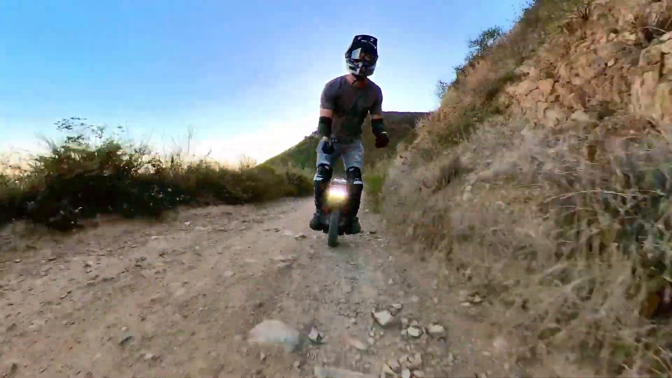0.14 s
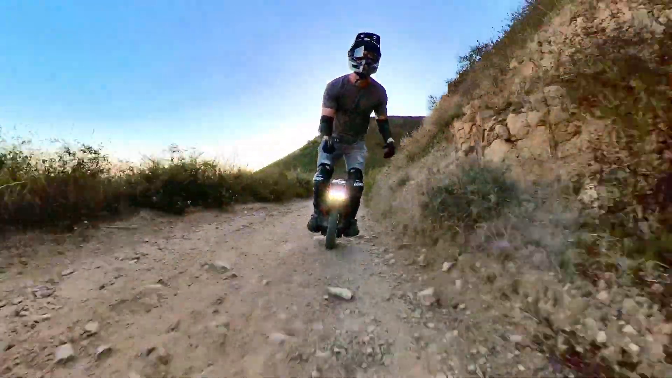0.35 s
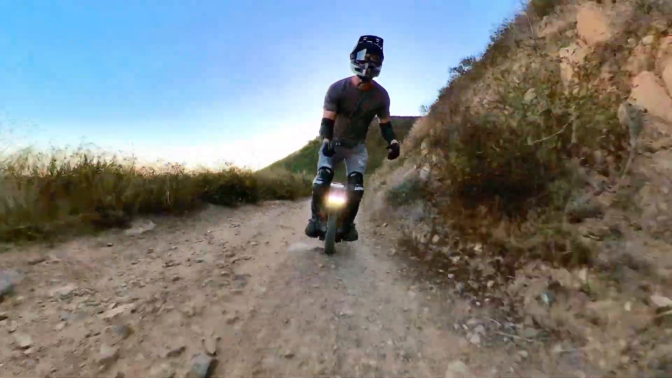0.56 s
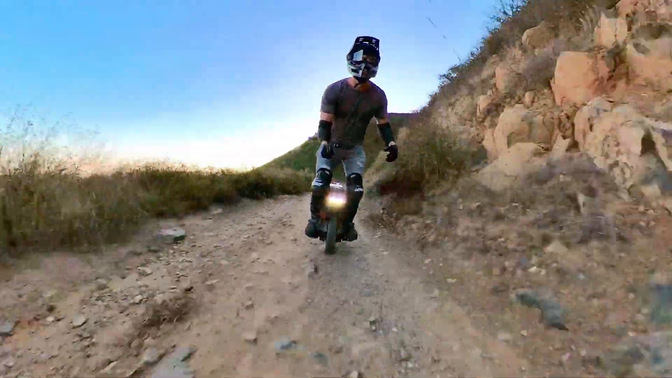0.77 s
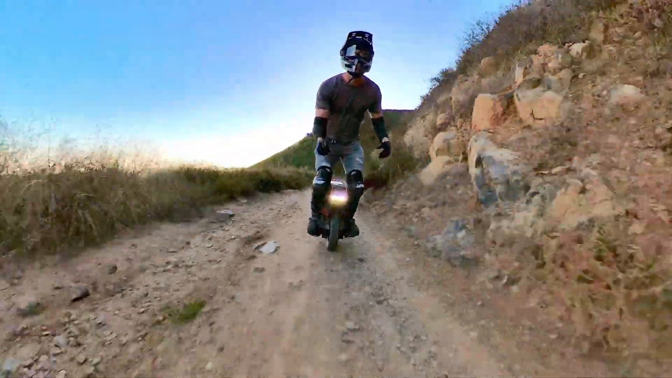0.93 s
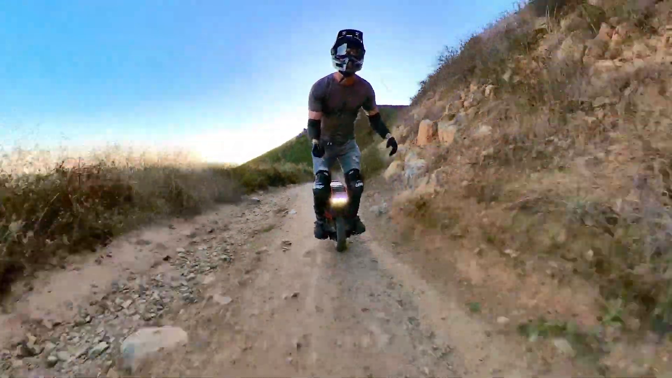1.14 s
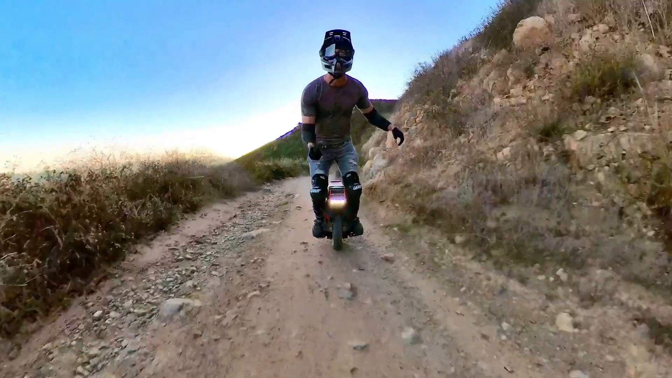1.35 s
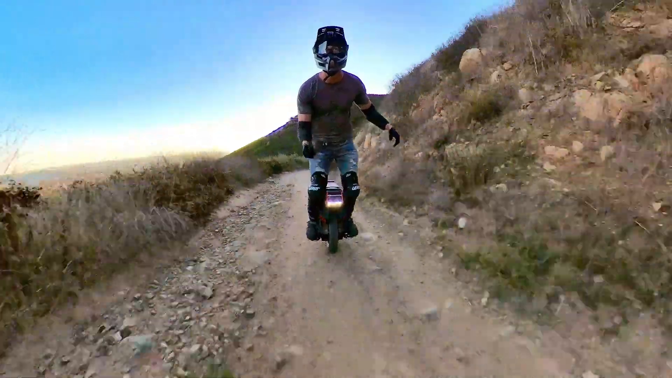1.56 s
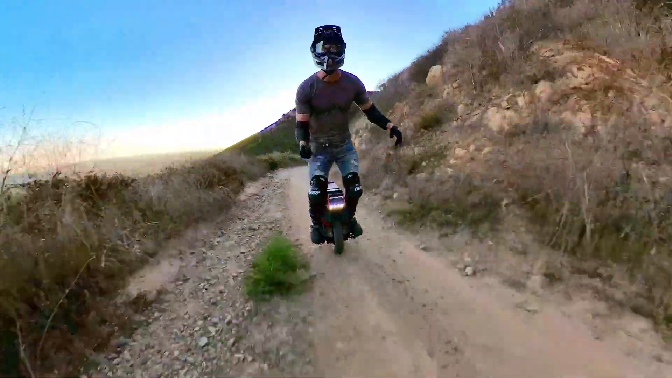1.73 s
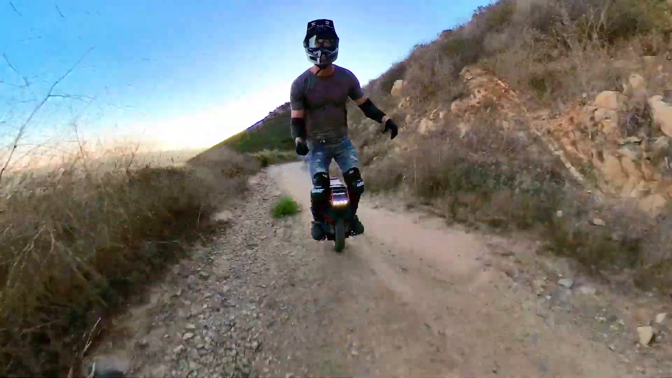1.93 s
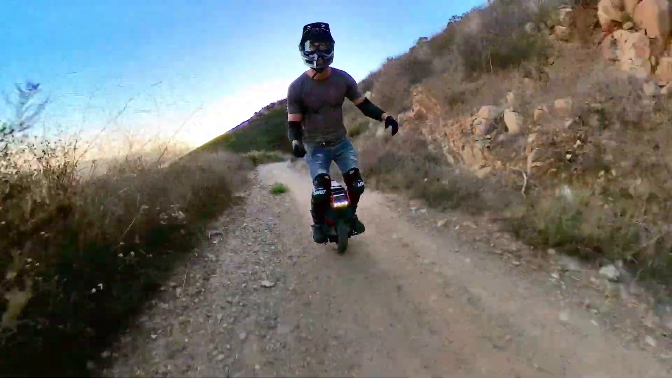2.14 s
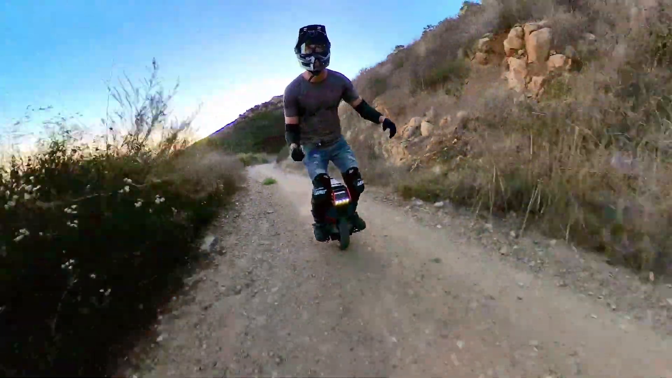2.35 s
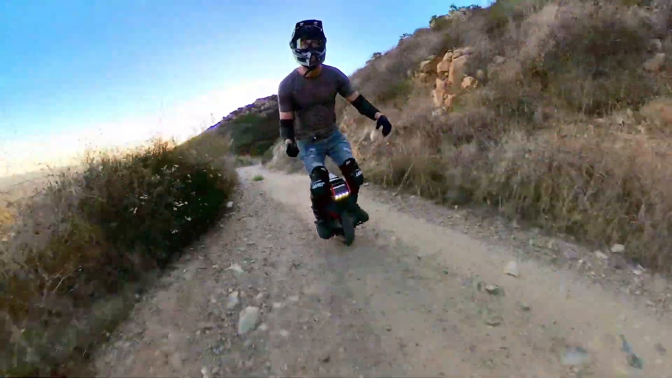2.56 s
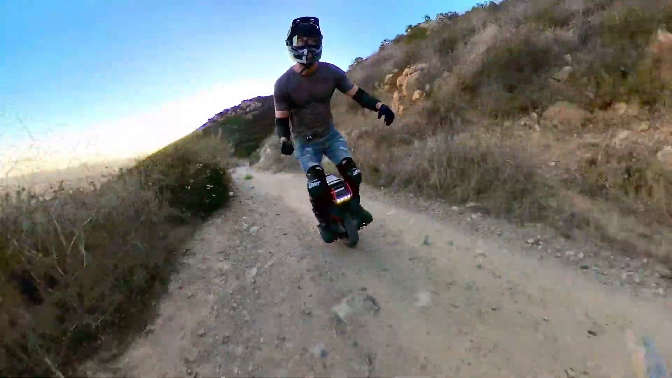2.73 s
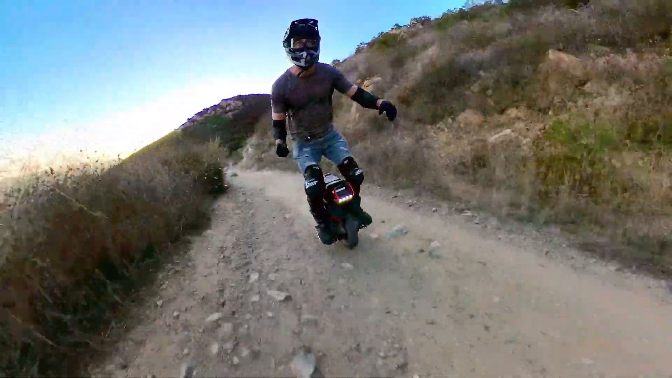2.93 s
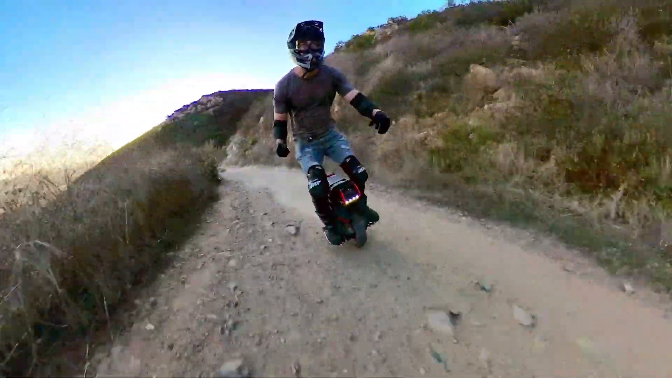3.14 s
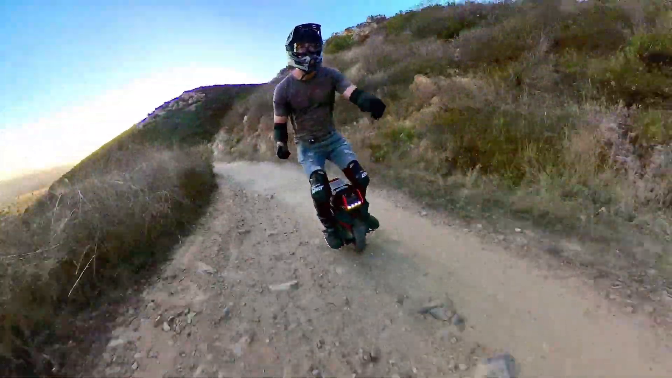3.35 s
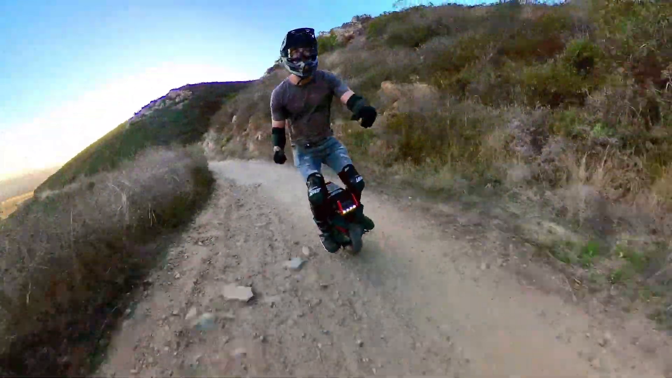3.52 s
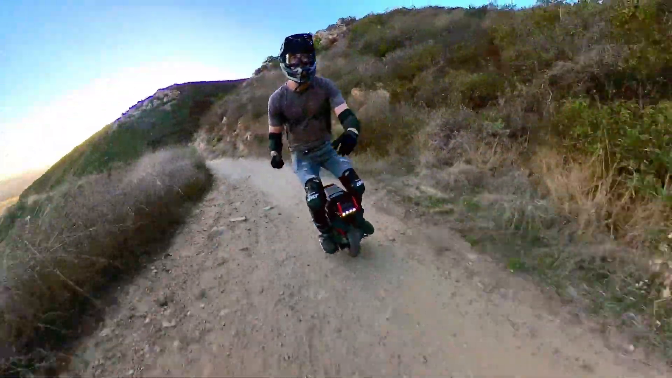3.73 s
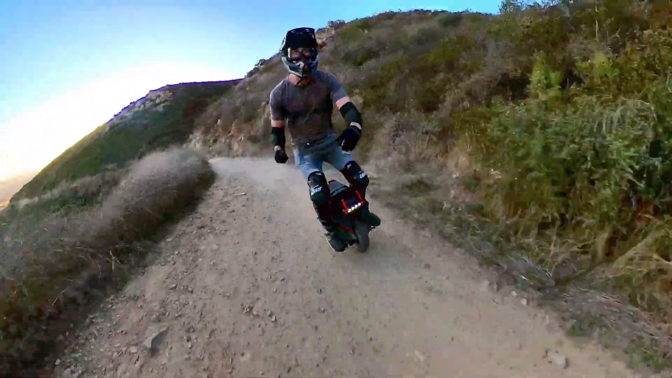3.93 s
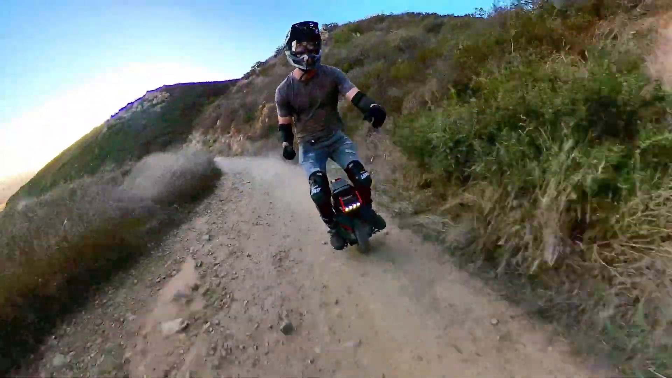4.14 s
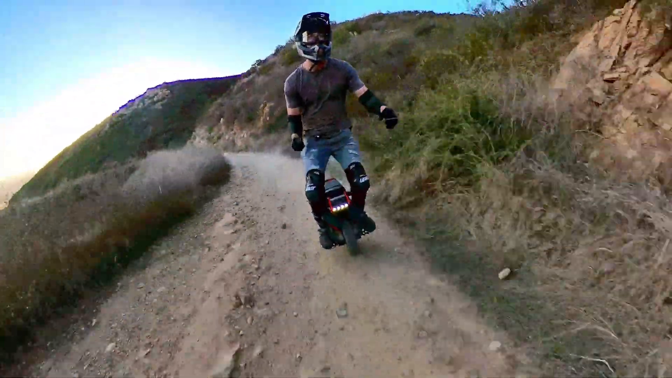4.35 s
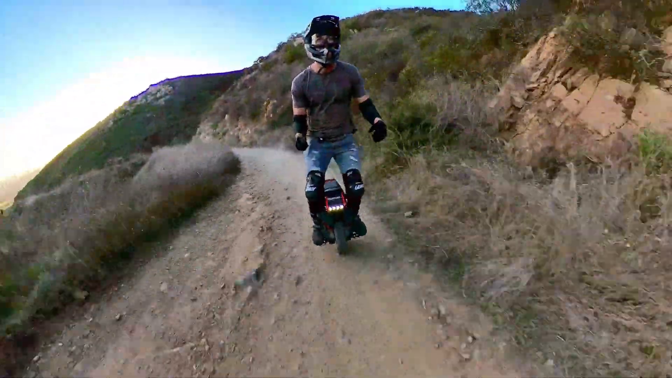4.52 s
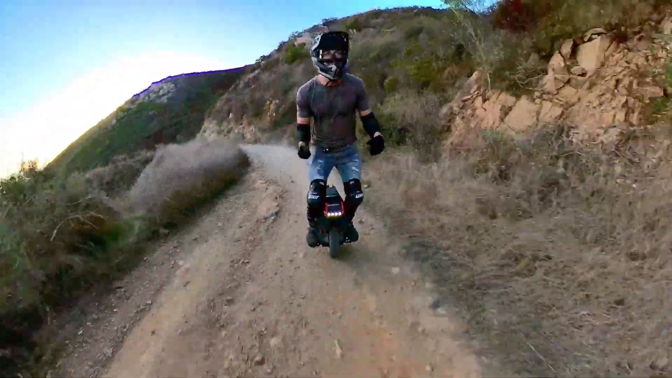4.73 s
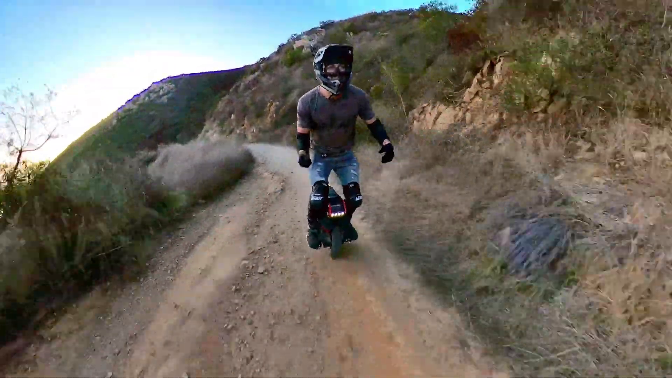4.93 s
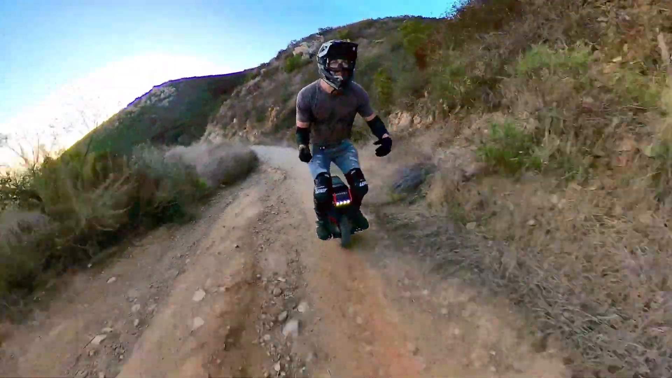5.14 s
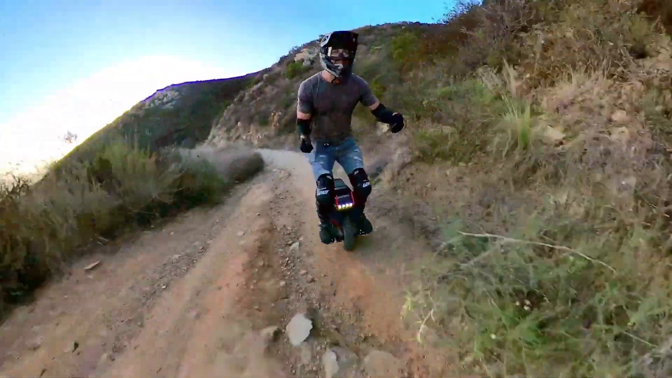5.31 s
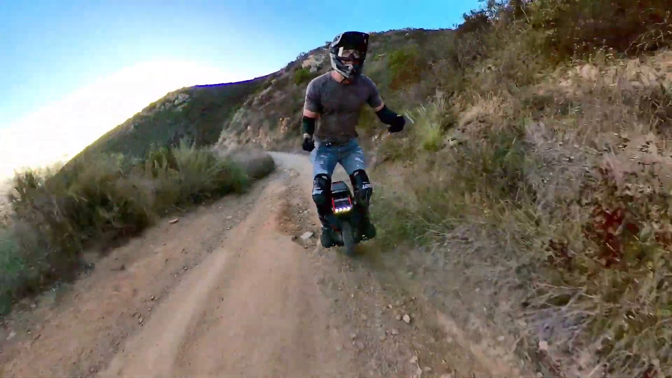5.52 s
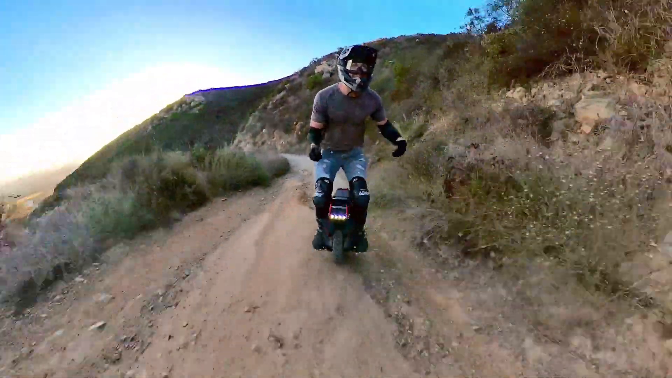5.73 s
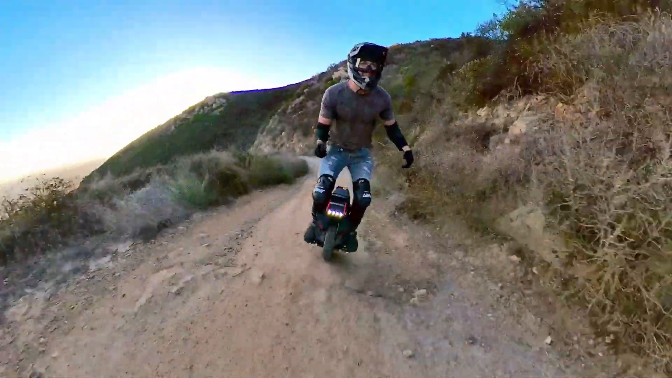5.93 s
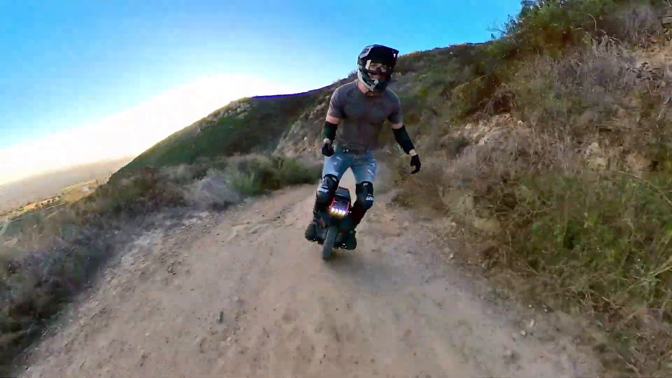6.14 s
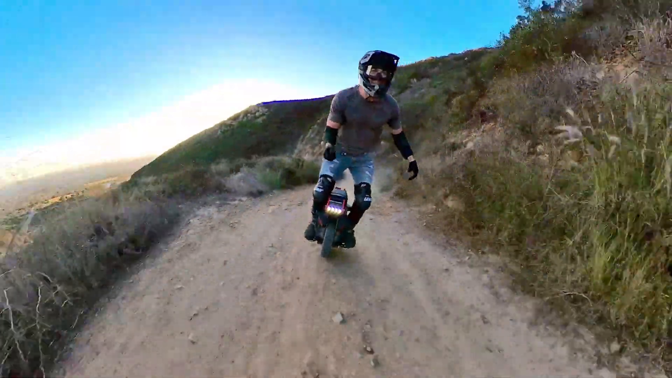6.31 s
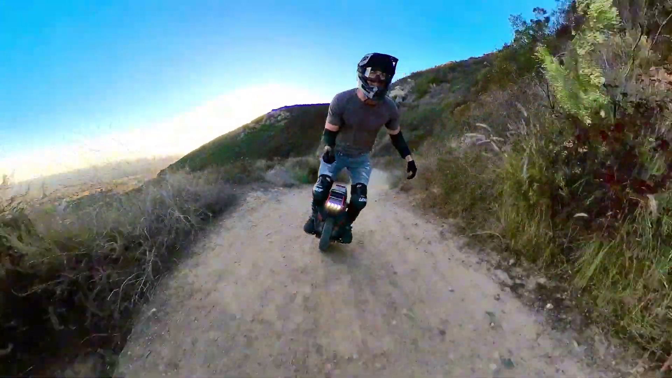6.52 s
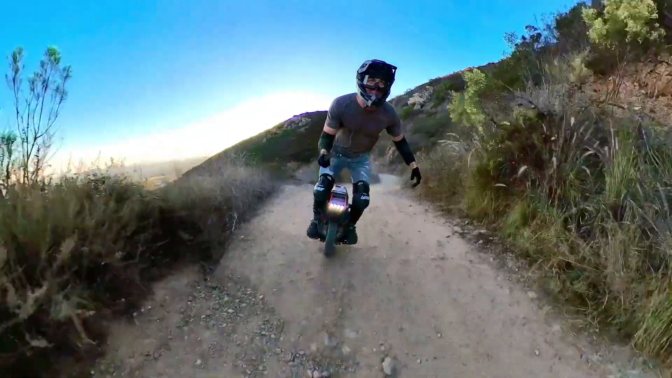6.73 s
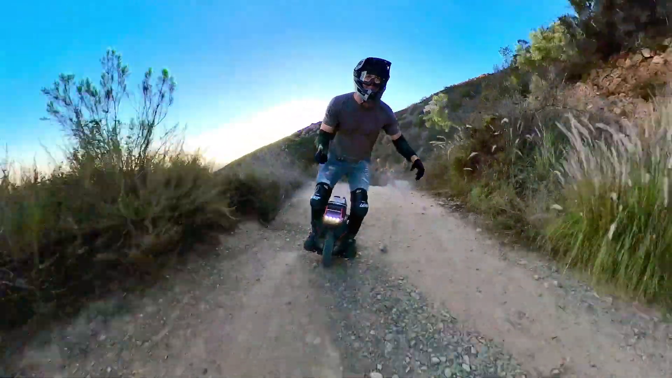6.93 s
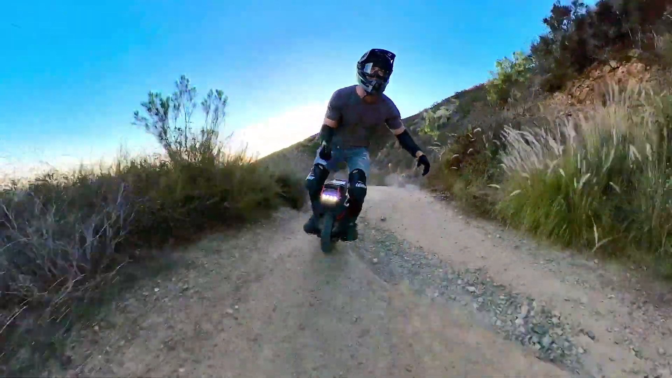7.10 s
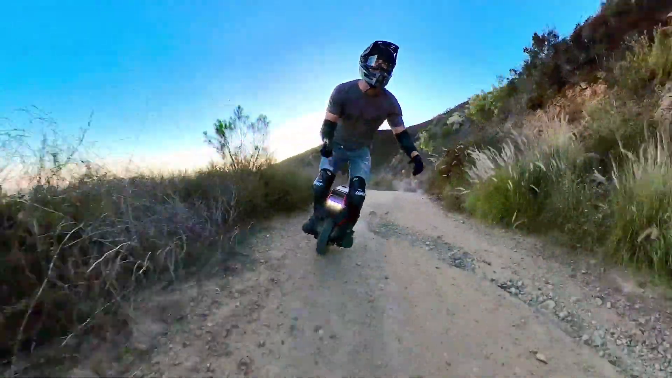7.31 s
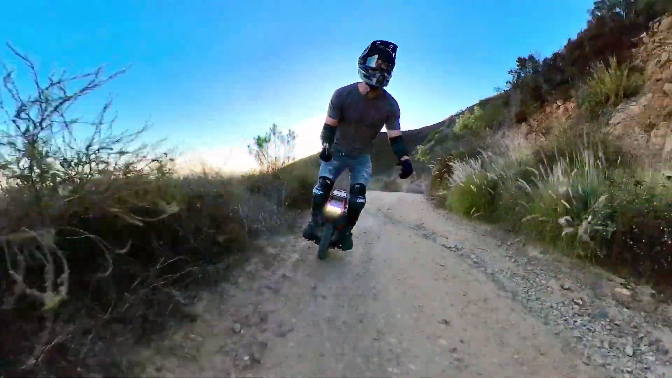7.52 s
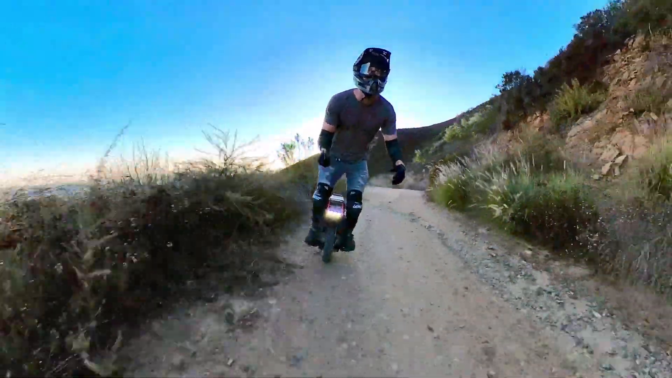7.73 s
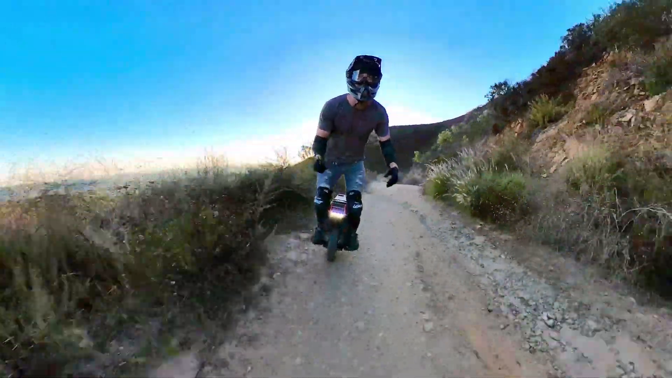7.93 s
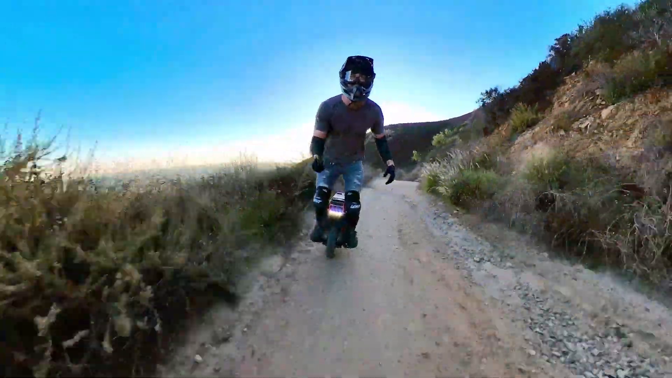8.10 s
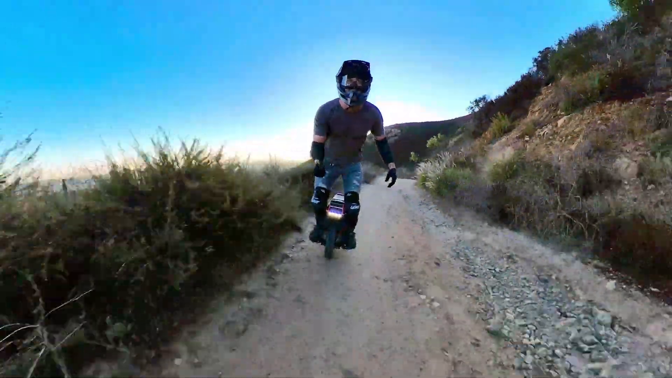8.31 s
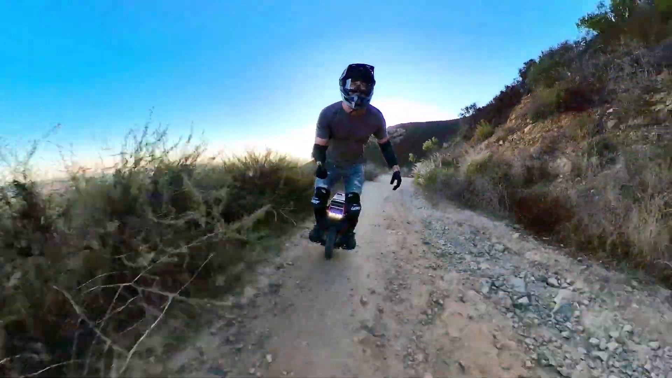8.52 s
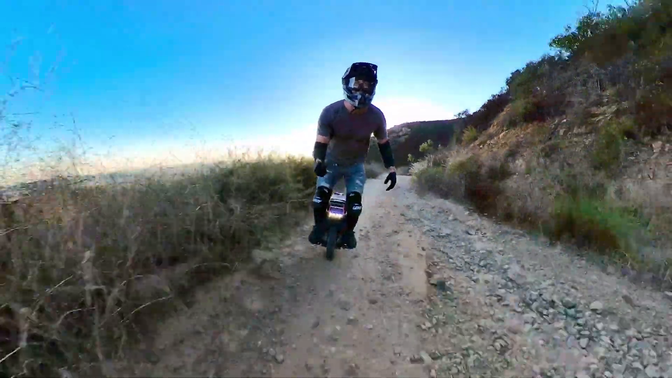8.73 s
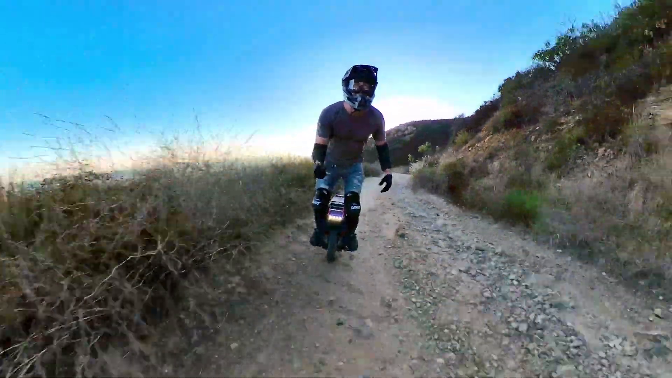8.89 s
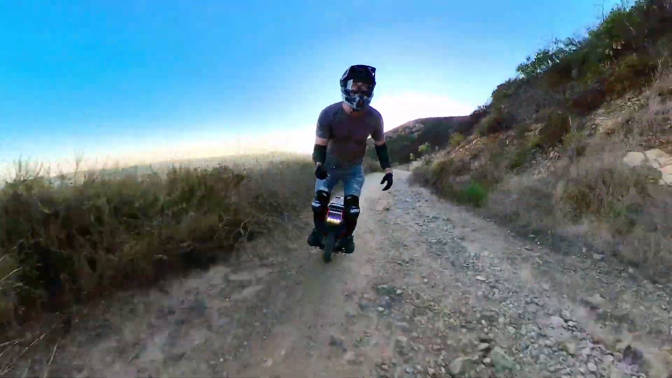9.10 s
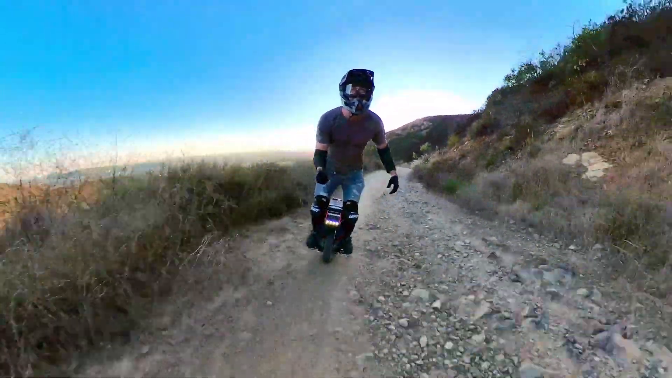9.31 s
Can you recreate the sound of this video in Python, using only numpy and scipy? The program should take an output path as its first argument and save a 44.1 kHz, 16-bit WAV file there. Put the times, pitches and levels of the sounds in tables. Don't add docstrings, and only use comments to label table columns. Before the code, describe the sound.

A single rubber tyre rolls continuously over a dry, stony dirt trail in open air, heard from a couple of metres away on a small wind-buffeted microphone with dulled treble. From 0 to 1 s, grit crackles with scattered dull knocks while low wind rumble swells. Between 1 and 2 s gusts thump the microphone hard, near 1.6 and 1.9 s. Around 2.8 to 4 s the ground is roughest: dense crunching, quick stone knocks, snaps, bright pebble ticks, a strong slap at 3.4 s and thin metal jingles near 3.9 s. From 4.3 s it thins, with brief crunchy bursts and a clear small jingle at 5.76 s. Around 6 to 6.7 s it is quietest, apart from brief gusts and grit. From 7 s crunch, thuds and wind return, with gusts near 8.3 s and clustered knocks around 9 s, ending mid-roll at about 9.4 s.

```python
import sys
import numpy as np
from scipy import signal
from scipy.fft import rfft, irfft
from scipy.io import wavfile
from scipy.ndimage import uniform_filter1d

SR = 44100
rng = np.random.default_rng(int(sys.argv[2]) if len(sys.argv) > 2 else 0)


def log_audio(samples):
    frames = np.atleast_2d(samples).T
    limited = np.clip(frames, -1, 1)
    pcm = np.round(limited * 32767).astype(np.int16)
    wavfile.write(sys.argv[1], SR, pcm)


def volts_from_db(level):
    exponent = np.asarray(level, float) / 20
    return 10 ** exponent


N = 417180

# (frequency [Hz], level [dB per Hz])
COARSE_BODY = [(500, -18.5), (1000, 2), (1300, 0), (2000, -5), (3000, -14), (3800, -25), (4800, -40),
               (5600, -55)]
# (frequency [Hz], level [dB per Hz])
FINE_BODY = [(2820, -57.5), (4800, -26), (5300, -16), (6790, 2), (7220, 1), (7860, -0.5), (8270, -5.5),
             (8680, -15), (9080, -22.5), (11800, -56.5), (20000, -120)]
# (frequency [Hz], level [dB per Hz])
STONE_BODY = [(500, -17), (1000, 4), (1800, -3.5), (2600, -9.5), (3600, -21), (5000, -37), (7500, -32)]
# (time [s], peak [dB], pitch [Hz])
STONE_KNOCKS = [(0.151, -23, 517), (0.508, -30, 970), (0.712, -26.5, 680), (0.958, -23, 530),
                (1.103, -23, 964), (1.245, -24, 662), (1.662, -20.5, 530), (1.973, -21.5, 923),
                (2.656, -22.5, 760), (3.131, -18, 570), (3.358, -19, 557), (3.418, -15, 840),
                (3.658, -21.5, 759), (3.768, -27, 760), (4.285, -21, 538), (4.298, -18, 597),
                (5.115, -30, 641), (5.4, -27.5, 735), (5.762, -23.5, 860), (5.937, -28.5, 720),
                (6.904, -36, 902), (7.07, -19.5, 513), (7.611, -18.5, 546), (7.731, -15.5, 516),
                (8.032, -27, 730), (8.306, -16, 520), (8.969, -20.5, 720), (9.007, -16, 650),
                (9.038, -15, 625), (9.116, -23, 935)]
# (time [s], length [s], crunch [dB], extra fine grit [dB])
STONY_PATCHES = [(.045, 0.0074, 1, 8), (.51, 0.02, 10.5, 1.5), (1.07, 0.052, 1, -3.5),
                 (1.24, 0.056, 1, -3.5), (2.33, 0.09, 4.5, 0.5), (2.82, 0.11, 1, -1),
                 (3.38, 0.092, 1.5, 0.5), (3.5, 0.056, -0.5, 2), (3.635, 0.0057, -10, -2),
                 (3.765, 0.065, 3.5, 2), (3.86, .03, -0.5, 7), (3.995, 0.013, -2, 7),
                 (4.275, 0.044, 9, -0.5), (4.645, 0.029, 6, 0.5), (5.112, 0.019, 3.5, -2),
                 (5.43, 0.02, 5.5, 3), (5.648, 0.049, 9, 8.5), (5.77, 0.14, 6.5, 2.5), (5.92, 0.032, 0, 5),
                 (5.615, 0.013, 1, 10.5), (6.05, 0.052, 3.5, 4), (7.07, 0.021, 5.5, 6.5),
                 (6.235, 0.0083, 7, 8), (6.91, 0.068, 8.5, -5), (7.13, 0.058, 6.5, 3.5),
                 (7.7, 0.051, 4.5, -6), (8.56, 0.07, 2.5, -3.5), (9.0, 0.031, 3.5, -0.5),
                 (9.15, 0.03, 6, -4), (9.24, 0.073, 3.5, 7), (2.5, .08, -0.5, 0), (5.51, 0.067, -2, -3.5),
                 (6.6, 0.017, 4.5, 5), (6.79, 0.07, 0.5, 2), (7.2, 0.026, -2, 0), (7.27, 0.032, 1.5, -1),
                 (7.54, .04, 0.5, 2), (7.94, 0.014, -2, 4), (8.28, 0.054, 5, -0.5), (3.95, 0.046, -3, 1),
                 (6.29, 0.078, 2, 2), (6.5, .03, 2, 4)]
PATCH_RISE = 0.18


def colour(x, table):
    size = 16384
    hz, db = np.transpose(table)
    bins_hz = np.arange(size // 2 + 1) * SR / size
    gain_db = np.interp(np.log(bins_hz + 1), np.log(hz), db, db[0] - 18.5, db[-1] - 40.5)
    cep = irfft(gain_db * np.log(10) / 20)
    cep[1:size // 2] *= 2
    cep[size // 2 + 1:] = 0
    impulse = irfft(np.exp(rfft(cep)))
    return signal.fftconvolve(x, impulse)[:len(x)]


def unit(x):
    return x / np.sqrt(np.mean(x ** 2))


def curves(table):
    s, *columns = np.transpose(table)
    return [np.interp(np.arange(N) / SR, s, c) for c in columns]


def bumps(table, column, rise=1.):
    t = np.arange(0, N, 32) / SR
    db = np.zeros(len(t))
    for row in table:
        flank = np.where(t < row[0], rise, 1)
        db += row[column] * np.exp(-.5 * ((t - row[0]) / row[1] / flank) ** 2)
    return np.interp(np.arange(N) / SR, t, db)


def walk(rate):
    k = max(int(SR / rate), 1)
    held = np.repeat(rng.standard_normal(N // k + 1), k)
    return 1.51 * uniform_filter1d(uniform_filter1d(held, k), k)[:N]


def grains(rate, spread_db):
    when, size, sign = rng.random(N), rng.exponential(size=N), rng.standard_normal(N)
    level = volts_from_db(spread_db * np.minimum(size, 4))
    return unit((when < rate / SR) * level * np.sign(sign))


def add(out, s, sound):
    i = max(int(s * SR), 0)
    out[i:i + len(sound)] += sound[:N - i]


def blows(table, cycles, trim_db):
    out = np.zeros(N)
    phase = rng.random(len(table))
    for (s, db, hz), start in zip(table, phase):
        t = np.arange(int(7 * cycles / hz * SR)) * hz / SR
        shape = (1 - np.exp(-(t / 0.21) ** 2)) * np.exp(-t / cycles)
        add(out, s, volts_from_db(db + trim_db) * shape * np.sin(2 * np.pi * (t + start)))
    return signal.sosfilt(signal.butter(3, 2500, fs=SR, output="sos"), out)


def cracks_at(table, decay_s, body):
    out, length = np.zeros(N), 600
    crack = rng.standard_normal((len(table), length)) * np.exp(-np.arange(length) / SR / decay_s)
    spaced = np.pad(crack, ((0, 0), (0, length)))
    struck = colour(spaced.ravel(), body).reshape(len(table), -1)
    for (s, db), c in zip(table, struck):
        add(out, s, volts_from_db(db) * c / np.abs(c).max())
    return out


def efforts():
    # (time [s], strength [dB], lean to large eddies [dB], extra small eddies [dB])
    wind_levels = [(0, -29, -2, 2), (.34, -24, -0.5, 3), (.42, -20.5, 4.5, -2), (.94, -24, 4.5, 4),
                   (1.0, -23, 0.5, 0.5), (1.6, -23, -1.5, 1), (2.3, -27.5, -2.5, -.5),
                   (2.8, -26.5, -0.5, 2.5), (3.8, -24.5, 1.5, 1), (3.95, -30, -0.5, 4.5),
                   (4.6, -29.5, 1.3, -3), (5.2, -32, -1, 1.5), (6.1, -34, 1, -2.5), (6.4, -38, 0.5, 3.5),
                   (6.85, -32.5, -0.5, 1.7), (7.5, -28.5, 1, 0), (8.1, -29, -1, -1), (9.46, -28, -2, 3)]
    # (time [s], length [s], swell [dB])
    gust_swells = [(.51, 0.039, -5), (.62, 0.043, -0.5), (1.24, 0.04, 5.5), (1.4, 0.05, -4.5),
                   (1.66, 0.032, 3), (1.76, 0.036, -2), (2.55, 0.14, 6), (2.66, 0.034, -9.5),
                   (3.9, 0.031, -9), (4.5, 0.036, 2.5), (4.64, 0.026, -11.5), (5.48, 0.079, 7.5),
                   (5.53, 0.028, -9.5), (6.03, 0.11, 6.5), (6.16, 0.055, -6), (6.22, 0.016, 11.5),
                   (6.93, 0.04, -8.5), (7.01, 0.12, 5.5), (8.22, 0.047, 10), (8.88, 0.053, 8),
                   (9.01, 0.018, 8.5), (4.31, 0.053, 0), (4.72, 0.049, 0), (5.13, 0.047, 6),
                   (7.3, 0.036, -4), (8.39, 0.067, 5), (8.72, 0.063, 0)]
    calm_db, rush_follow = -29, 0.86
    strength, lean, fine = curves(wind_levels)
    gust = bumps(gust_swells, column=2)
    stony = bumps(STONY_PATCHES, column=2, rise=PATCH_RISE)
    small = strength - lean + 0.29 * gust
    rumble_db = strength + lean + gust - 1.5
    rush_db = calm_db + rush_follow * (small - calm_db) - 16
    return volts_from_db([rumble_db, small - 4, rush_db + fine + 1.21 * stony, rush_db + 0.7 * stony])


def wind(eddy):
    # (frequency [Hz], level [dB per Hz])
    rumble_body = [(8.8, -50), (15, -11.5), (64, 2.5), (93, -1), (160, -11.5), (210, -37), (350, -120)]
    buffet_body = [(60, -30), (110, 0), (200, -2), (350, -9.5), (600, -31)]
    rush_body = [(200, -23.5), (350, -6.5), (600, -7.5), (800, -10.5), (1150, -20.5), (2000, -35)]
    rumble, buffet, rush, _ = efforts()
    puffs, flutter = grains(rate=250., spread_db=2.0), walk(25.)
    low = colour(0.58 * puffs + rng.standard_normal(N), rumble_body)
    low *= volts_from_db(0.33 * eddy + 0.37 * flutter)
    mid = colour(puffs + 0.41 * rng.standard_normal(N), buffet_body)
    mid *= volts_from_db(0.9 * eddy + 1.27 * flutter)
    small = .4 * puffs + grains(rate=900., spread_db=5.0) + 0.65 * rng.standard_normal(N)
    high = colour(small, rush_body) * volts_from_db(1.4 * eddy + 0.16 * flutter + 2.0 * walk(60.))
    return rumble * unit(low) + buffet * unit(mid) + rush * unit(high)


def ground():
    # (time [s], crunch [dB])
    looseness = [(0.0, -50.5), (0.34, -49.5), (0.55, -55), (1.4, -50), (1.68, -57), (2.21, -55),
                 (2.9, -45.5), (3.32, -47), (4.24, -54.5), (4.42, -58), (5.87, -56.5), (6.14, -64.5),
                 (6.53, -63.5), (6.77, -55.5), (7.09, -52), (8.06, -56), (8.3, -56), (9.46, -50)]
    # (time [s], length [s], depth [dB])
    tyre_hops = [(3.434, 0.0086, -13), (3.73, .012, -12), (5.602, 0.0097, -12), (5.738, 0.011, -9),
                 (6.005, 0.022, -2.5), (6.21, .02, -2), (6.89, 0.006, -5), (7.05, 0.0056, -6),
                 (9.07, 0.026, -5), (6.475, 0.015, -9), (8.988, 0.0046, -8), (6.415, .008, -1)]
    trail_db, fine_follow = -50.5, 0.97
    hop = bumps(tyre_hops, column=2)
    crunch = curves(looseness)[0] + bumps(STONY_PATCHES, column=2, rise=PATCH_RISE)
    fine = trail_db + fine_follow * (crunch - trail_db)
    fine += bumps(STONY_PATCHES, column=3, rise=PATCH_RISE)
    return volts_from_db(hop), volts_from_db(hop + crunch + 2.5), volts_from_db(hop + fine - 16)


def grit(eddy):
    # (frequency [Hz], level [dB per Hz])
    tread_body = [(470, -27), (600, -6.5), (710, -13.5), (850, -0.5), (960, -1), (1040, -4), (1130, -24),
                  (1500, -41.5)]
    contact, crunch, fine = ground()
    cracks = grains(rate=1100., spread_db=3.5)
    patch = 0.55 * walk(25.) + 1.05 * walk(80.)
    coarse = colour(cracks + 0.6 * rng.standard_normal(N), COARSE_BODY)
    coarse *= volts_from_db(1.55 * patch + 0.97 * eddy)
    sand = colour(cracks + 0.88 * grains(rate=900., spread_db=2.5), FINE_BODY)
    sand *= volts_from_db(0.97 * patch + 1.4 * walk(150.))
    tread = colour(.6 * cracks + rng.standard_normal(N), tread_body) * volts_from_db(3.0 * walk(60.))
    hum = contact * volts_from_db(-5.5) * efforts()[3] * unit(tread)
    return crunch * volts_from_db(-1.5) * unit(coarse) + fine * volts_from_db(0.25) * unit(sand) + hum


def clatter(low_hz, high_hz, rate, sharpness, body):
    sizes = 12
    taps, which = grains(rate, spread_db=4.0), rng.integers(sizes, size=N)
    rung = np.zeros(N)
    for k, hz in enumerate(np.geomspace(low_hz, high_hz, sizes)):
        b, a = signal.iirpeak(hz, sharpness, SR)
        rung += unit(signal.lfilter(b, a, taps * (which == k))) * np.sqrt(hz)
    return unit(colour(rung, body))


def loose_stones():
    _, crunch, fine = ground()
    coarse = clatter(900., 3640., rate=1300., sharpness=12., body=COARSE_BODY)
    small = clatter(5900., 8700., rate=250., sharpness=70., body=FINE_BODY)
    return volts_from_db(-5.0) * crunch * coarse + volts_from_db(-4.0) * fine * small


def knocks():
    # (time [s], peak [dB], pitch [Hz])
    raps = [(0.017, -32, 450), (0.045, -28.5, 455), (0.211, -21.5, 450), (1.676, -26, 960),
            (1.03, -30, 565), (1.311, -30, 519), (1.83, -32, 495), (1.868, -26, 452), (1.909, -22.5, 482),
            (2.063, -20, 480), (2.259, -28, 816), (2.283, -25, 455), (2.402, -31, 517), (2.737, -29, 482),
            (3.208, -26, 484), (3.454, -23.5, 651), (3.632, -21.5, 457), (3.756, -28, 500),
            (3.866, -26.5, 490), (4.999, -35.5, 455), (5.645, -24.5, 734), (5.795, -32, 546),
            (6.926, -25.5, 600), (7.116, -25, 885), (7.251, -33, 490), (7.364, -29, 705), (7.501, -31, 482),
            (7.534, -20, 438), (7.713, -27, 490), (8.163, -27, 509), (8.657, -29, 487), (8.919, -24, 464),
            (8.982, -28, 650), (9.269, -24, 479)]
    return blows(STONE_KNOCKS, cycles=0.96, trim_db=3.0) + blows(raps, cycles=1.93, trim_db=2.0)


def pebbles():
    # (time [s], peak [dB])
    ticks = [(0.0278, -44), (0.0478, -39.5), (0.2259, -42), (0.3072, -47.5), (0.3915, -40), (0.6409, -49),
             (1.2386, -44), (2.8848, -45), (3.0789, -48), (3.1268, -47), (3.4521, -43), (3.5663, -40),
             (3.6122, -44), (3.6481, -38.5), (3.8217, -46), (3.8666, -32.5), (3.933, -45), (3.9913, -39),
             (5.6491, -46), (5.7069, -44), (5.7633, -36), (5.8431, -46), (6.2607, -49), (7.0289, -43.5),
             (7.0683, -47), (7.1277, -46), (7.7174, -47), (9.2194, -60), (9.2574, -50), (9.3671, -50)]
    # (time [s], peak [dB])
    flicks = [(0.2374, -47), (0.2678, -44), (0.3646, -50), (0.7537, -45.5), (0.8974, -48), (0.9577, -48),
              (0.9757, -47), (1.5499, -51), (1.723, -56), (2.362, -48), (2.4014, -49), (2.4668, -53),
              (3.0525, -46), (3.1014, -49), (3.266, -55), (3.3697, -50), (3.3977, -57), (3.5149, -51),
              (3.8462, -44), (3.8935, -44), (3.9544, -46), (4.595, -54), (5.6096, -51), (5.6331, -48),
              (6.4308, -56), (6.9037, -52), (6.9446, -50), (7.7314, -59), (7.9324, -58), (8.098, -52),
              (8.2821, -52), (8.3115, -52), (8.3948, -55), (8.7705, -56), (8.8648, -47), (9.1247, -57),
              (9.1696, -45.5), (9.1965, -48), (9.2938, -38)]
    return volts_from_db(-0.5) * (cracks_at(ticks, 0.0018, FINE_BODY) + cracks_at(flicks, 0.0011, FINE_BODY))


def gust_slaps():
    # (time [s], peak [dB], pitch [Hz])
    thumps = [(1.241, -15.5, 143), (1.305, -31, 143), (1.482, -17, 155), (1.598, -17, 143),
              (1.632, -9, 167), (1.66, -14, 221), (1.868, -16, 145), (1.895, -11.5, 205), (1.946, -15, 143),
              (2.036, -12, 148), (2.457, -15, 176), (2.584, -11.5, 167), (3.418, -8.5, 170),
              (3.624, -14.5, 142), (3.659, -13, 173), (4.488, -11.5, 140), (4.792, -28, 181),
              (4.997, -18, 214), (5.399, -21, 167), (5.639, -18, 252), (6.197, -19.5, 143),
              (7.248, -15, 192), (7.528, -14, 145), (7.608, -18, 148), (7.715, -17, 207), (8.077, -17, 172),
              (8.822, -16, 151), (8.895, -12.5, 160), (8.98, -15, 236), (9.015, -12, 166)]
    # (time [s], peak [dB], pitch [Hz])
    slaps = [(0.044, -31, 226), (0.21, -25, 159), (0.258, -17, 161), (0.287, -35, 152), (0.555, -14, 121),
             (0.777, -23, 135), (0.88, -17, 120), (2.077, -20, 134), (2.186, -19, 257), (3.209, -16.5, 135),
             (3.525, -31, 127), (3.744, -16.5, 175), (3.993, -24, 156), (4.332, -31, 127),
             (4.836, -31, 156), (5.045, -29, 121), (5.173, -24, 121), (5.267, -27, 161),
             (5.444, -24.5, 199), (5.558, -19.5, 144), (5.813, -42, 135), (5.994, -21.5, 133),
             (6.069, -24, 196), (6.447, -33, 143), (6.788, -39, 215), (7.031, -27, 153), (7.49, -26, 140),
             (7.906, -22, 194), (8.155, -23, 127), (8.305, -13, 124), (8.354, -16.5, 129),
             (8.422, -16, 148), (8.516, -19, 159), (9.21, -23, 121), (9.402, -26, 148)]
    # (time [s], peak [dB], pitch [Hz])
    more_thumps = [(1.184, -20.5, 183), (2.474, -13.5, 135), (2.54, -18.5, 140), (2.554, -19, 148),
                   (2.758, -21, 133), (2.819, -16.5, 186), (3.365, -15, 145), (3.764, -12, 185),
                   (3.779, -13.5, 180), (3.809, -16.5, 240), (7.504, -19, 155), (7.644, -30, 132),
                   (8.219, -18, 167), (8.654, -23, 132)]
    strong = blows(thumps, cycles=0.46, trim_db=7.5) + blows(more_thumps, cycles=0.46, trim_db=7.5)
    return strong + blows(slaps, cycles=0.72, trim_db=6.0)


def stone_snaps():
    # (time [s], peak [dB])
    snaps = [(0.152, -24.5), (0.641, -30), (0.7793, -34), (0.8949, -33), (1.056, -30.5), (1.239, -28.5),
             (1.8766, -31), (2.3096, -49), (2.4016, -29.5), (2.8178, -41), (2.9004, -36), (2.9208, -42),
             (3.2949, -48), (3.3942, -39), (3.4464, -29.5), (3.484, -35), (3.5225, -31.5), (3.6143, -33),
             (3.6775, -29.5), (3.7407, -40), (4.1116, -41), (4.165, -37), (4.912, -36), (5.111, -32),
             (5.3106, -35), (5.5758, -38), (6.237, -36.5), (7.947, -34.5), (9.0278, -29), (9.2399, -42)]
    # (time [s], peak [dB])
    chips = [(0.1351, -38), (0.239, -35), (0.2797, -39), (0.3097, -48), (1.1797, -50), (1.1962, -42),
             (1.2226, -44), (1.3389, -39), (1.3713, -42), (1.4067, -43), (1.4691, -48), (1.5529, -37.5),
             (2.204, -40), (2.5346, -47), (2.716, -48), (2.7541, -36), (3.0999, -46), (3.5613, -38),
             (3.756, -41), (3.7723, -34), (3.8187, -38), (4.6498, -43), (5.434, -42), (5.611, -49),
             (6.2496, -43), (6.4996, -51), (6.9043, -38), (7.1227, -52), (7.27, -37), (7.3243, -41),
             (7.4657, -36), (7.5443, -38), (8.283, -45), (8.312, -31.5), (8.9106, -36), (9.2994, -32),
             (9.3751, -30.5)]
    knocked = [(s, db - 25) for s, db, hz in STONE_KNOCKS]
    snapped = volts_from_db(-1.5) * cracks_at(snaps + knocked, 0.0022, STONE_BODY)
    return snapped + volts_from_db(1.0) * cracks_at(chips, 0.0035, STONE_BODY)


def ring(table, hz, trim_db, column, hold_s):
    out, t = np.zeros(N), np.arange(SR // 3) / SR
    chance = rng.random((len(table), 2))
    for row, (start, choke) in zip(table, chance):
        free = 1.1 / (1 + np.exp((t - hold_s - 0.017 * choke) / 0.0049)) + 0.16
        fade = free * np.exp(-np.log(1000) * t / .5) * np.minimum(t / .001, 1)
        tone = np.sin(2 * np.pi * (hz * t + start))
        add(out, row[0], volts_from_db(row[column] + trim_db) * fade * tone)
    return out


def jingle():
    # (time [s], peak [dB], second ring [dB])
    hard_jolts = [(1.4691, -66, -78.5), (1.5994, -62, -84), (2.401, -61, -74), (2.4768, -60, -77),
                  (2.5411, -50.5, -79), (3.6126, -71, -73), (3.7833, -57, -61), (3.867, -48, -62),
                  (3.9094, -56, -67), (3.9918, -45, -67), (4.1714, -53, -64), (4.3804, -57, -78),
                  (4.9452, -64, -73), (5.3413, -60, -70), (5.7194, -58, -74), (5.7643, -42.5, -53),
                  (5.8441, -58, -69), (5.9224, -57, -65), (6.0994, -65, -61), (6.1883, -61.5, -93),
                  (6.264, -51, -81), (6.4338, -65, -74), (6.5081, -60, -86), (6.549, -62, -70),
                  (7.069, -59, -65), (7.1257, -51, -72), (7.3582, -60, -66), (7.5453, -62, -76),
                  (7.5986, -55.5, -76), (8.7016, -57, -85.5), ]
    # (time [s], peak [dB])
    touches = [(1.371, -71), (1.578, -61), (1.854, -62), (1.915, -65), (1.985, -71), (4.019, -68),
               (4.302, -70), (4.345, -63), (4.78, -64), (5.097, -66), (5.22, -66), (5.448, -59),
               (5.885, -62), (6.018, -69), (6.066, -63), (6.33, -68), (6.454, -63), (6.609, -67),
               (7.44, -59.5), (7.756, -69), (7.812, -68), (8.546, -64), (8.657, -69), (8.78, -66),
               (8.84, -70), (8.949, -74)]
    # (time [s], peak [dB])
    tinks = [(3.8686, -66), (3.91, -62.5), (5.763, -64), (5.9494, -69), (6.1894, -87), (6.265, -73),
             (6.558, -70.5)]
    # (time [s], peak [dB])
    clinks = [(5.7159, -67), (5.8526, -71), (5.884, -71), (6.0921, -80), (6.258, -77), (6.458, -73)]
    # (time [s], peak [dB])
    pings = [
        (5.9, -72),
        (6.43, -84),
    ]
    # (time [s], peak [dB])
    tings = [
        (5.72, -82),
        (6.065, -81),
        (6.45, -84),
    ]
    modes_hz = 6638, 6190, 6051, 3025, 3900, 1561, 5200
    jolts = hard_jolts + [(s, db, db - 11.5) for s, db in touches]
    struck = jolts, jolts, tinks, clinks, pings, tinks, tings
    trims_db = -5.0, -2.5, -3.0, 3.0, -3.0, 10.0, -8.0
    columns = 1, 2, 1, 1, 1, 1, 1
    holds_s = .03, .034, .04, .032, .05, .055, .04
    wavers_db = 3.8, 3.4, 2.8, 2.2, 2.0, 1.6, 1.5
    modes = zip(struck, modes_hz, trims_db, columns, holds_s)
    return sum(ring(*mode) * volts_from_db(db * walk(90.)) for mode, db in zip(modes, wavers_db))


def scene():
    eddy = walk(12.)
    trail = grit(eddy) + loose_stones() + knocks() + stone_snaps()
    return (wind(eddy) + gust_slaps() + trail + pebbles() + jingle())[None]


def roll_off(x):
    return signal.sosfilt(signal.butter(12, 9650, fs=SR, output="sos"), x)


def record(dry):
    soft = np.tanh(1.425 * dry) / 1.581
    cut = signal.sosfilt(signal.ellip(8, .3, 45, 9000, fs=SR, output="sos"), soft)
    return roll_off(cut)


dry = scene()
out = record(dry)
log_audio(out)
```